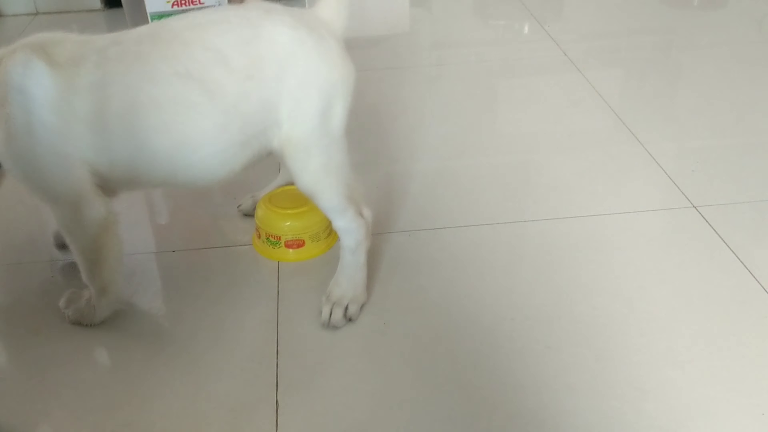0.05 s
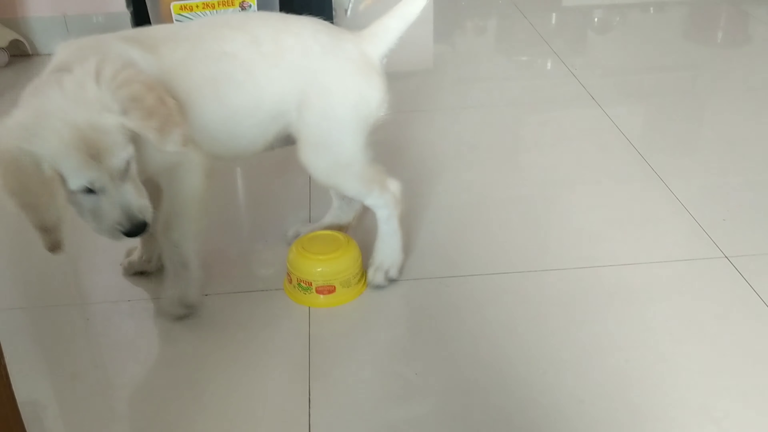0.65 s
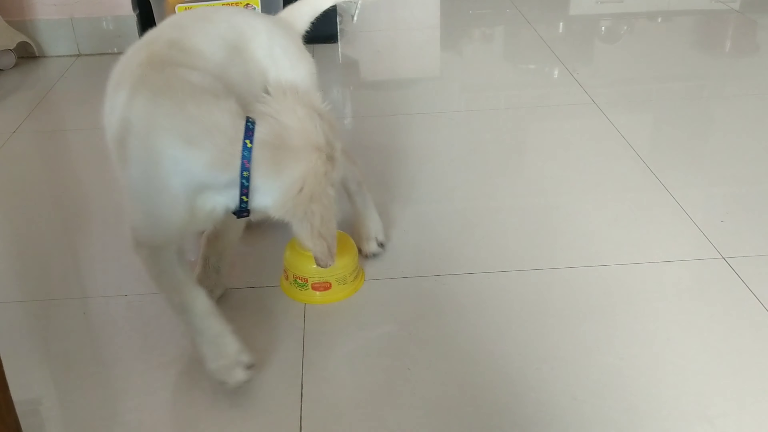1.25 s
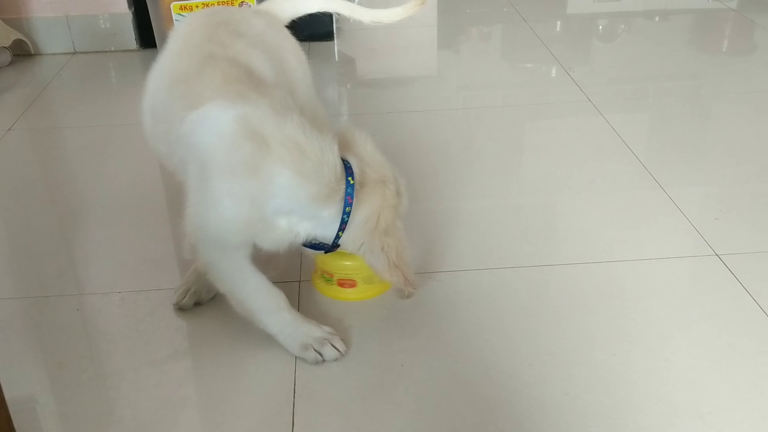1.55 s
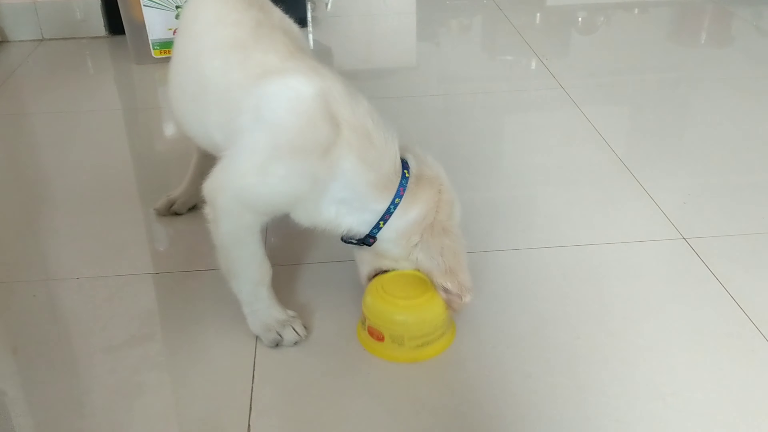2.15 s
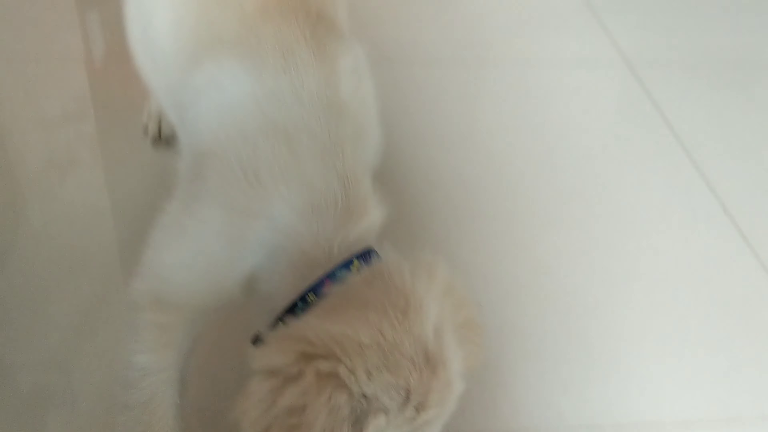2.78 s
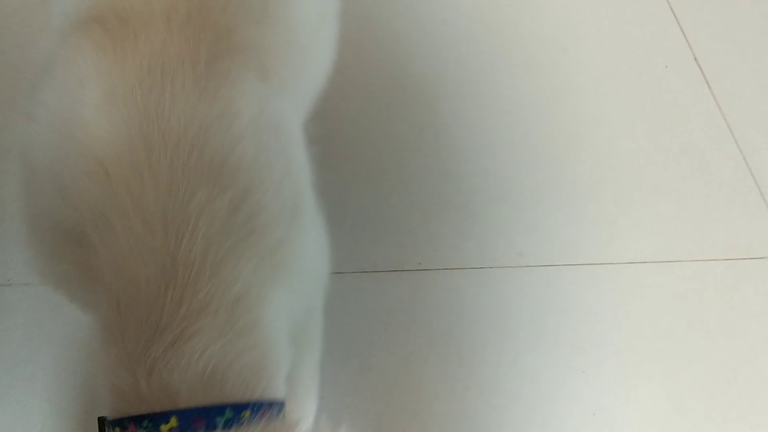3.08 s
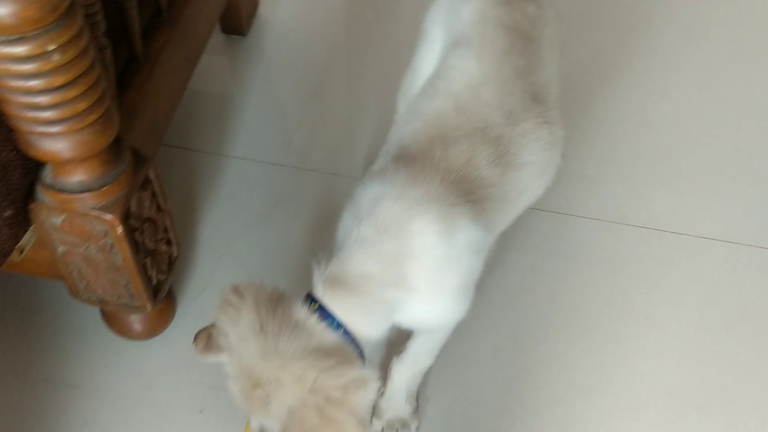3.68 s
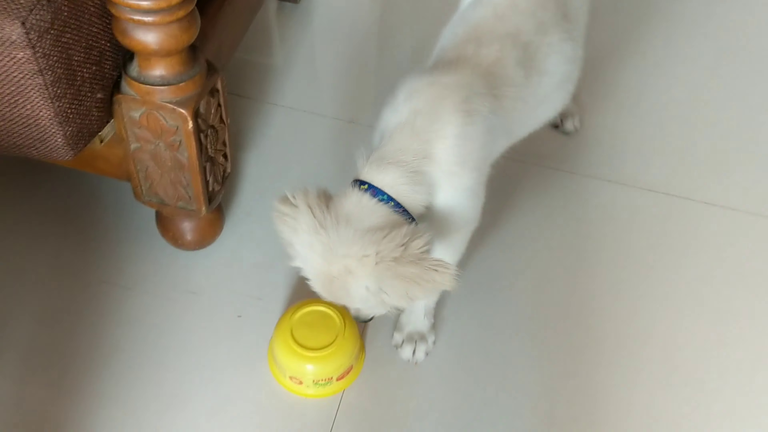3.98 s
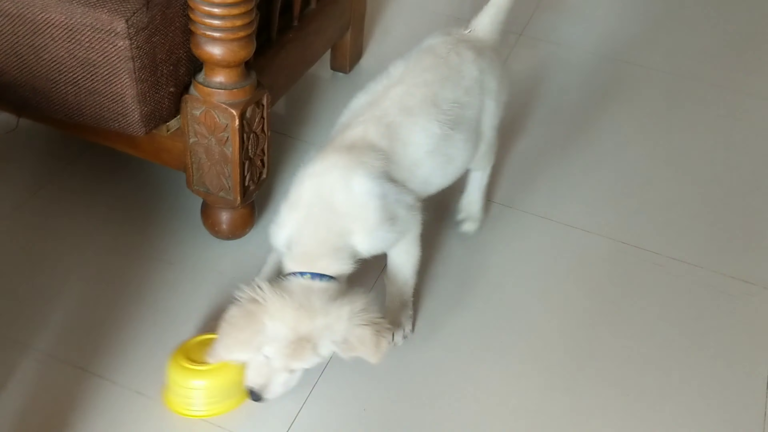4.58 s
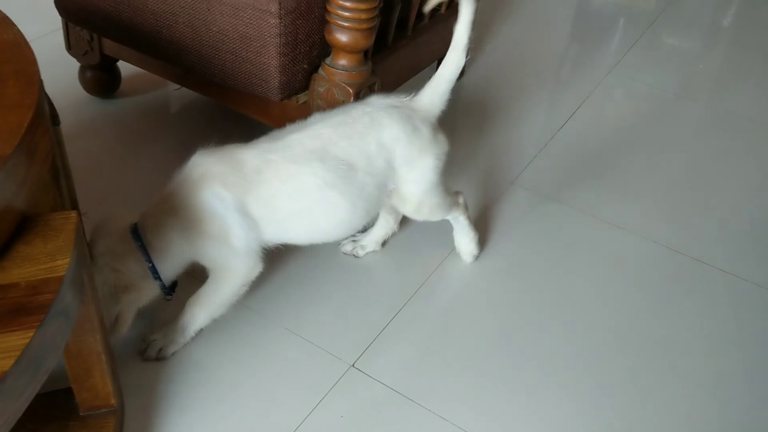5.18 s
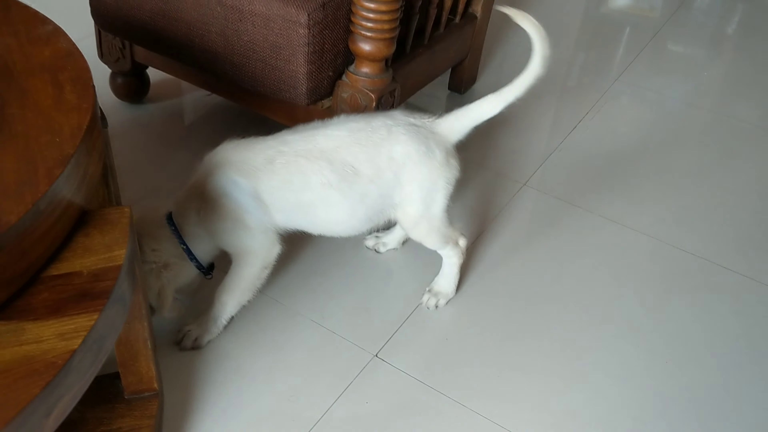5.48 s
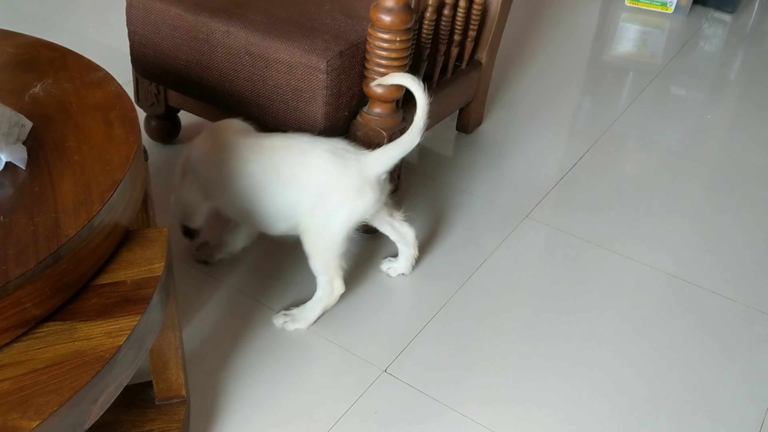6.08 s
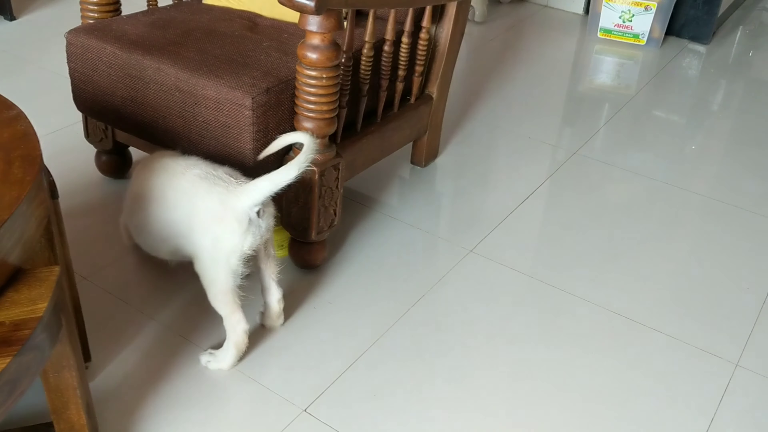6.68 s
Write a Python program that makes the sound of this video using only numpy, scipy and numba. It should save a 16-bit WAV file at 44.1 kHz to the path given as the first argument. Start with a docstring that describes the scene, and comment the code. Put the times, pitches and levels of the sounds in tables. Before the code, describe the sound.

A puppy pushes a light plastic bowl around a tile floor. Paws brush softly and a faint, thin whine sounds, then the bowl knocks and clatters with sharp, hollow hits while claws tick and a collar clinks. The bowl then scrapes along in short, juddering pushes, clatters again, and makes a last small slide after a brief sniff. The sound is centred, in a ringing, hard-walled room with a faint low hum.

```python
"""A light plastic bowl knocks, clatters and judders over floor tiles as a puppy noses it along.
Each knock is a rim crack and a boom of the shell; each push is a gritty stick-slip scrape.
Claws tick, paws brush the floor, the collar clinks, and the puppy gives one thin whine and a sniff.
The hard-walled room rings on over a bed of steady air and a low drone."""
import sys
import numpy as np
from scipy import signal
from scipy.fft import rfft, irfft
from scipy.io import wavfile
from scipy.ndimage import uniform_filter1d
from numba import njit

SR = 44100
rng = np.random.default_rng(int(sys.argv[2]) if len(sys.argv) > 2 else 0)


def pcm_store(signal):
    """Save signal as 16-bit PCM."""
    levels = np.round(np.clip(np.atleast_2d(signal), -1, 1) * 32767)
    wavfile.write(sys.argv[1], SR, levels.astype(np.int16).T)


N = 306120

# nudges that slide the bowl: t/s, length/s, attack/s, level/dB, base resonance/Hz, relative grit/dB
PUSHES = [(4.487, 0.052, 0.019, -42, 526, -2), (4.577, .065, .015, -38.5, 400, -27),
          (4.775, 0.034, 0.0085, -24.5, 640, -16.5), (4.819, 0.16, .015, -41.5, 627, -7.5),
          (5.015, .09, 0.0131, -34, 662, -11.5), (5.138, 0.082, .014, -31.5, 626, -7.5),
          (5.214, 0.094, 0.028, -29, 574, -13.5), (5.311, 0.051, 0.0057, -19, 648, -3),
          (5.381, 0.12, .015, -32, 565, -10), (5.926, 0.069, 0.0029, -30.5, 630, -12.5),
          (5.997, 0.13, .003, -32, 570, -12), (6.445, 0.063, 0.0062, -46.5, 700, -20),
          (6.702, 0.16, .09, -37.5, 430, -10), (6.864, 0.085, 0.0033, -35.5, 413, -11)]
# contact spectrum of plastic on tile: f/Hz, level/dB
PLASTIC_EQ = [(100, -42.5), (300, 3), (1000, -1.5), (2000, -4), (3800, -5.5), (5000, -8), (7000, -13),
              (10000, -19), (15500, -41)]
# contact spectrum of a claw on tile: f/Hz, level/dB
CLAW_EQ = [(100, -52), (250, -18), (550, -8.5), (800, 2), (1150, -20), (1500, -10.5), (2300, -3),
           (4000, -3), (5200, -4), (7000, -3.5), (10000, -13), (15500, -31)]


def undb(db):
    """Decibels to gain."""
    return 10 ** (np.asarray(db) / 20)


def unit(x):
    """Scale to rms 1."""
    return x / np.sqrt(np.mean(x ** 2) + 1e-20)


def peaked(x, db):
    """Scale so that the loudest 4 ms have this level."""
    return x * undb(db) / np.sqrt(uniform_filter1d(x ** 2, size=176).max())


def steady(x, hold_s=0.015):
    """Ride the gain to hold the short-term rms at 1."""
    return x / np.sqrt(np.abs(uniform_filter1d(x ** 2, int(hold_s * SR))) + 1e-18)


def add(track, start, x):
    """Mix x into the track at a start time in seconds."""
    i = max(int(start * SR), 0)
    track[i:i + len(x)] += x[:max(N - i, 0)]


def cut(x, hz, kind, order=2):
    """Butterworth low-pass or high-pass."""
    return signal.sosfilt(signal.butter(order, hz, kind, fs=SR, output="sos"), x)


def along(points, n):
    """Read (f/Hz, value) points at the bins of an n-point transform."""
    hz, value = np.transpose(points)
    return np.interp(np.log(np.arange(n // 2 + 1) * SR / n + 1), np.log(hz), value)


def colour(x, eq, size=4096):
    """Minimum-phase EQ through (f/Hz, level/dB) points."""
    cepstrum = irfft(np.log(undb(along(eq, size))))
    cepstrum[1:size // 2] *= 2
    cepstrum[size // 2 + 1:] = 0
    return signal.fftconvolve(x, irfft(np.exp(rfft(cepstrum))))[:len(x)]


@njit
def resonant_low(x, hz, damping):
    """State-variable low-pass with a sweepable resonant cutoff."""
    low, band_state, low_state = np.empty(len(x)), 0., 0.
    for i in range(len(x)):
        g = np.tan(np.pi * hz[i] / SR)
        band = (band_state + g * (x[i] - low_state)) / (1 + g * (g + damping))
        low[i] = low_state + g * band
        band_state, low_state = 2 * band - band_state, 2 * low[i] - low_state
    return low


def walk(rate, n):
    """Smooth random wander of spread 1, with `rate` turns a second."""
    hold = int(SR / rate)
    steps = np.random.default_rng(rng.integers(2 ** 31)).standard_normal(N // hold + 2)
    return unit(uniform_filter1d(np.repeat(steps, hold), hold))[:n]


def grains(rate, spread_db, n):
    """Random micro-impacts of unequal size, about `rate` a second."""
    fires = rng.random(SR)[:n] < rate / SR
    sign = rng.choice([-1, 1], SR)[:n]
    size = np.clip(rng.standard_normal(SR)[:n], -2, 2)
    return fires * sign * undb(spread_db * size)


def decay(t, t60):
    """Exponential fade, 60 dB down after t60 seconds."""
    return np.exp(-np.log(1000) * t / t60)


def burst(t60, size=6000):
    """Contact noise that dies in t60 seconds."""
    return rng.standard_normal(size) * decay(np.arange(size) / SR, t60)


def envelope(length_s, attack_s, release_s):
    """Time since the start and an attack, hold, release gate."""
    t = np.arange(0, length_s, 1 / SR)
    return t, np.clip(np.minimum(t / attack_s, (length_s - t) / release_s), 0, 1)


def bowl_knocks(flex_s=0.00153, chatter=0.051):
    """The rim cracks on the tile and chatters briefly; a moment later the whole shell flexes and booms."""
    # t/s, strength/dB, hardness/dB (more crack, less thump)
    knocks = [(1.627, -40, 4), (1.809, -32.5, 2.5), (2.063, -43.5, -5), (2.163, -18, -2), (2.217, -31, 3),
              (2.341, -38.5, -6), (2.591, -41, -3.5), (2.807, -13, 0), (2.847, -31, -6), (2.872, -8, -1),
              (3.043, -36, -7), (3.257, -26, -2), (3.294, -25.5, 1), (3.553, -25.5, -1.5), (3.642, -29, -7),
              (4.287, -51.5, -7.5), (4.597, -35.5, -6), (5.309, -9.5, 3.5), (5.321, -18, 4),
              (5.396, -16, -1), (5.456, -26, -2.5), (5.494, -27.5, -3), (6.293, -53, 10), (6.866, -37, 5)]
    out = np.zeros(N)
    for start, db, hardness in knocks:
        thump_db, crack_db = db - hardness, db + hardness - 12
        force = chatter * burst(t60=0.028)
        force[0] += 1
        ring = signal.fftconvolve(force, bowl_ring())
        thump = cut(cut(ring, 537, "low", order=4), 184, "high", order=3)
        body = cut(cut(ring, 532, "high", order=4), 972, "low", order=5)
        wall = cut(cut(ring, 1340, "high", order=3), 4300, "low", order=3)
        shell = peaked(body, db - 2) + peaked(thump, thump_db) + peaked(wall, crack_db - 6)
        crack = colour(burst(t60=0.018) + 0.4 * burst(t60=0.05), PLASTIC_EQ)
        add(out, start, peaked(crack, crack_db))
        add(out, start + flex_s, shell)
    return out


def bowl_ring(scatter_db=2.0, detune=0.032, size=6000):
    """The bowl's response to one touch; the place of contact weights and shifts its modes."""
    # shell modes: f/Hz, level/dB, t60/s
    modes = [(189, -16, 0.022), (290, -1.5, 0.019), (409.4, 2.5, 0.031), (503, -0.5, 0.034),
             (640, -1.5, 0.11), (659, 6, 0.051), (843, -17.5, 0.033), (1070, -41, 0.023),
             (1230, -3.5, 0.021), (1650, -10, 0.027), (2250, -12, .025), (3280, 1.5, 0.026),
             (3780, -8, 0.027), (4580, -5, 0.05), (5636, -2.5, 0.034), (6700, -3, 0.055)]
    hz, db, t60 = np.transpose(modes)[:, :, None]
    weight, shift = rng.standard_normal((2, len(modes), 1))
    t = np.arange(size) / SR
    partials = np.cos(2 * np.pi * hz * (1 + detune * shift) * t)
    return np.sum(undb(db + scatter_db * weight) * decay(t, t60) * partials, axis=0)


def bowl_base(force, hz):
    """The flat base booms at one resonance and passes little above it."""
    boom = resonant_low(cut(force, 210, "high", order=4), hz, damping=0.1)
    return resonant_low(boom, hz * 1.14, damping=0.9)


def bowl_jerks(sudden_s=0.016, slip_t60=0.057):
    """The base breaks loose with one sharp slip and a few small ones; slow pushes hardly jerk."""
    out = np.zeros(N)
    for start, _, attack, db, hz, _ in PUSHES:
        force = burst(slip_t60)
        force[0] += 14
        boom = bowl_base(force, np.full(len(force), float(hz)))
        grit = cut(colour(burst(slip_t60), PLASTIC_EQ), 4100, "low")
        suddenness = 1 / (1 + (attack / sudden_s) ** 2)
        add(out, start + attack / 2, suddenness * (peaked(boom, db + 3) + peaked(grit, db - 19)))
    return out


def bowl_slides(catch_db=4.5, sag_db_per_s=37, sag_hz_per_s=83, sweep_db_per_s=33):
    """The base sticks and slips on the glaze, the shell rocks; fine grit rasps through the thin wall."""
    out = np.zeros(N)
    for start, length, attack, db, hz, grit_db in PUSHES:
        t, gate = envelope(length, attack, release_s=0.02)
        n = len(t)
        catch = gate * steady(undb(catch_db * walk(110.3, n)))  # the rim catches and lets go
        slips = grains(rate=700, spread_db=3.0, n=n)
        rocking = cut(cut(slips, 640, "low", order=4), 189, "high", order=5)
        judder = steady(bowl_base(slips, hz - sag_hz_per_s * t)) + undb(-10) * unit(rocking)
        grit = grains(rate=2000, spread_db=2.7, n=n)
        wall = cut(signal.fftconvolve(grit, bowl_ring())[:n], 910, "high")
        rasp = unit(unit(colour(grit, PLASTIC_EQ)) + undb(-7) * unit(wall))
        rasp_gain = undb(grit_db - 2 - sweep_db_per_s * t)  # grit is swept from under the base
        scrape = undb(-3) * judder + rasp_gain * rasp
        add(out, start, catch * undb(db - sag_db_per_s * t) * scrape)
    return out


def claw_ticks(body_db=-5, top_db=-3):
    """Claws and teeth make short hard taps, each with its own brightness."""
    # t/s, level/dB, brightness/dB
    ticks = [(2.15, -33.5, -9), (2.1841, -36.5, -0.5), (2.59, -35, -22), (2.7442, -39, -17),
             (2.942, -42, -1), (3.0619, -33.5, -7), (3.0836, -35.5, -12), (3.1194, -29.5, -15.5),
             (3.2101, -43.5, 0), (3.3732, -36, -18), (3.6017, -38, -10), (4.6858, -17, -27.5),
             (5.0947, -35, -10), (5.1717, -26.5, -6), (5.295, -18, -5.5)]
    out = np.zeros(N)
    for start, db, brightness in ticks:
        tap = colour(burst(t60=0.018), CLAW_EQ)
        body = peaked(cut(tap, 4500, "low", order=4), db + body_db)
        top = peaked(cut(tap, 6260, "high", order=4), db + brightness + top_db)
        add(out, start, body + top)
    return out


def paw_shuffles(hiss_db=-1, pad_db=-4, uneven_db=3.0):
    """Pads and fur brush the tiles over soft dull padding; now and then a claw grazes the glaze."""
    # t/s, length/s, level/dB, relative padding/dB, hiss cutoff/Hz
    strokes = [(1.521, 0.23, -57, 5.5, 8200), (2.298, 0.17, -56.5, 6, 7600),
               (2.448, 0.35, -55, -5.5, 14000), (3.015, 0.053, -43.5, -13, 8000),
               (3.29, 0.15, -57.5, 16.5, 7000), (3.487, 0.13, -47.5, 3.5, 3300),
               (3.588, 0.26, -54.5, -4, 7000), (4.449, 0.303, -53, 0, 7900)]
    # contact spectrum of a paw on tile: f/Hz, level/dB
    paw_eq = [(100, -36), (400, 7), (1000, -7.5), (2000, -2.5), (4500, -2.5), (7000, -5.5), (10000, -10.5),
              (15500, -9.5)]
    out = np.zeros(N)
    for start, length, db, weight_db, top_hz in strokes:
        t, gate = envelope(length, attack_s=0.013, release_s=0.054)
        n = len(t)
        fur = colour(grains(rate=3000, spread_db=4.5, n=n), paw_eq)
        brush = steady(resonant_low(fur, np.full(n, float(top_hz)), damping=np.sqrt(2)))
        pats = grains(rate=370, spread_db=8.6, n=n)
        padding = steady(cut(cut(pats, 590, "low", order=3), 150, "high", order=3))
        tap = peaked(colour(burst(t60=0.018), CLAW_EQ), db=4)
        claws = signal.fftconvolve(grains(rate=16, spread_db=3.1, n=n), tap)[:n]
        hiss = brush * undb(hiss_db + uneven_db * walk(42.8, n))
        add(out, start, gate * undb(db) * (hiss + padding * undb(weight_db + pad_db) + claws))
    return out


def whine(flutter=0.022, shimmer_db=2, fade_s=0.0081):
    """A thin whistle through the nose with a fast flutter in its pitch."""
    # whistle contour: t/s, f/Hz, level/dB
    contour = [(1.775, 3790, -60), (1.83, 3900, -48.5), (1.99, 3815, -42.5), (2.16, 3720, -48)]
    times, pitches, levels = np.transpose(contour)
    start = times[0]
    t, gate = envelope(times[-1] - start + fade_s, fade_s, fade_s)
    hz, db = np.interp(start + t, times, pitches), np.interp(start + t, times, levels)
    wobble = unit(cut(walk(260, len(t)), 45, "high"))
    phase = 2 * np.pi * np.cumsum(hz * (1 + flutter * wobble)) / SR
    tone = np.sin(phase) + undb(-18) * np.sin(2 * phase) + undb(-29) * np.sin(3 * phase)
    out = np.zeros(N)
    add(out, start, gate * unit(tone) * undb(db + shimmer_db * walk(61.4, len(t))))
    return out


def sniff(start_s=6.447, level_db=-52.5):
    """A short puff of air through the puppy's nose."""
    # nose resonances: f/Hz, width/Hz, level/dB
    formants = [(1080, 190, 4.5), (2500, 310, 5), (3000, 270, -11), (4930, 200, -6.5)]
    t, gate = envelope(length_s=0.076, attack_s=0.021, release_s=0.028)
    air = rng.standard_normal(SR)[:len(t)]
    puff = sum(undb(db) * unit(signal.lfilter(*signal.iirpeak(hz, hz / width, fs=SR), air))
               for hz, width, db in formants)
    out = np.zeros(N)
    add(out, start_s, gate * unit(puff) * undb(level_db))
    return out


def collar():
    """The small metal ring on the collar tinkles faintly; later the buckle clinks."""
    # modes of each part: f/Hz, level/dB, t60/s
    ring_modes = [(3460, -1, 0.17), (7800, -1, .15), (8750, -4, .13), (12600, -8, .13), (13900, -9, .1)]
    buckle_modes = [(2000, -5, 0.26), (3560, 3, 0.17), (4420, -5, 0.11), (7540, -13, 0.11)]
    tinkle = clink(ring_modes, start_s=0.023, level_db=-58.5)
    return tinkle + clink(buckle_modes, start_s=3.12, level_db=-42)


def clink(modes, start_s, level_db, size=14000):
    """One light touch sets a small metal part ringing."""
    out, t = np.zeros(N), np.arange(size) / SR
    ring = sum(undb(db) * decay(t, t60) * np.sin(2 * np.pi * hz * t) for hz, db, t60 in modes)
    add(out, start_s, peaked(ring, level_db))
    return out


def room(x, early_db=4, early_s=0.042, predelay_s=0.0041, size=44100):
    """Close furniture answers first, then the tiles and walls ring on, duller as they fade."""
    # reverb bands: f/Hz, t60/s, level/dB
    bands = [(140, 1, -3.5), (260, 0.83, 0), (430, 0.85, 0), (960, 0.77, 1.5), (3750, 1, -0.5),
             (7000, 0.91, -1.5), (14000, 0.47, 2.5)]
    t = np.arange(size) / SR
    noise, tail = rfft(rng.standard_normal(size)), np.zeros(size)
    for hz, t60, db in bands:
        share = along([(band[0], float(band[0] == hz)) for band in bands], size)
        tail += irfft(noise * share, size) * undb(db) * decay(t, t60)
    tail *= (t > predelay_s) * undb(early_db * np.exp(-t / early_s))
    return signal.fftconvolve(x, tail / np.sqrt(np.sum(tail ** 2)))[:N]


def room_tone(air_db=-53.5, drone_hz=99, waver=0.073, drone_db=-68.5, rise_db_per_s=1.53, swell_db=4.0):
    """Steady air and a low wavering drone that slowly grows."""
    # spectrum of the air: f/Hz, level/dB
    air_eq = [(15, -52), (25, -83), (42, -5), (96, 2), (144, -3), (170, -7.5), (333, -7), (403, -10.5),
              (449, -12.5), (572, -10), (637, -12.5), (1120, -13.5), (5000, -26), (10000, -34.5),
              (15800, -37)]
    air = unit(cut(colour(rng.standard_normal(N), air_eq), 45, "high"))
    pitch = drone_hz * (1 + waver * walk(25, N))
    drone = unit(np.sin(2 * np.pi * np.cumsum(pitch) / SR))
    drone_gain = undb(drone_db + rise_db_per_s * np.arange(N) / SR + swell_db * walk(15, N))
    return undb(air_db) * air + drone_gain * drone


def scene(hit_send_db=-3, rub_send_db=-0.5, whine_dry_db=-5):
    """Everything happens at one spot on the floor, in centred mono; the puppy's muzzle points away."""
    hits = bowl_knocks() + bowl_jerks() + claw_ticks() + collar()
    rubs = bowl_slides() + paw_shuffles() + sniff()
    voice = whine()
    reverb = room(undb(hit_send_db) * hits + undb(rub_send_db) * rubs + voice)
    mono = hits + rubs + undb(whine_dry_db) * voice + reverb + room_tone()
    return np.array([mono, mono])


def record(dry, top_hz=15800):
    """A steep low-pass takes the very top off the mix."""
    return signal.sosfilt(signal.ellip(10, .2, 80, top_hz, fs=SR, output="sos"), dry)


dry = scene()
out = record(dry)
pcm_store(out)
```